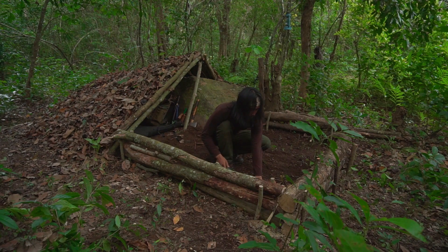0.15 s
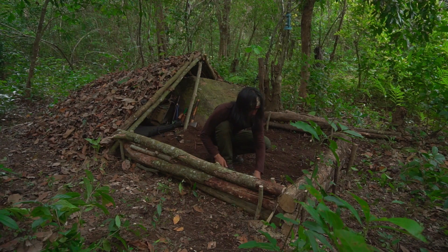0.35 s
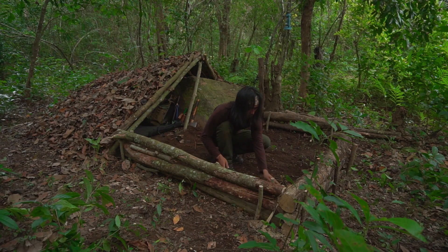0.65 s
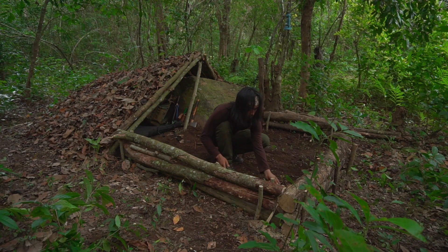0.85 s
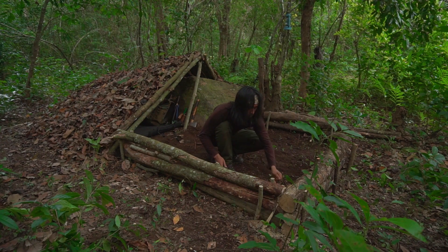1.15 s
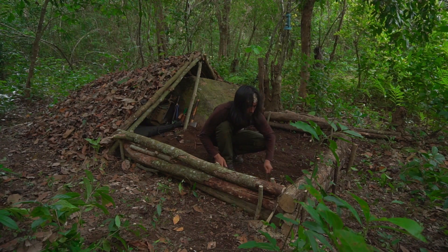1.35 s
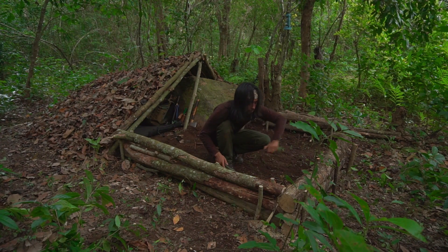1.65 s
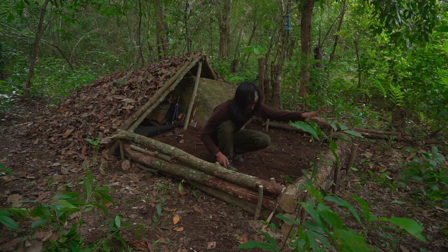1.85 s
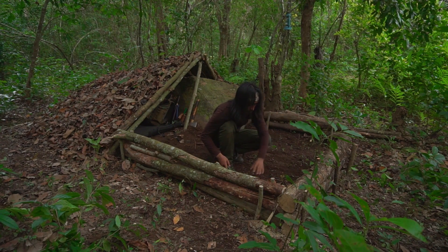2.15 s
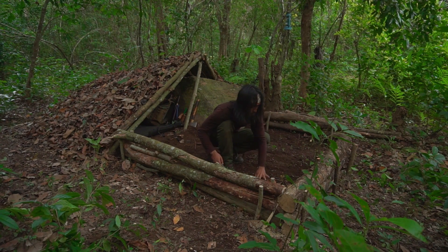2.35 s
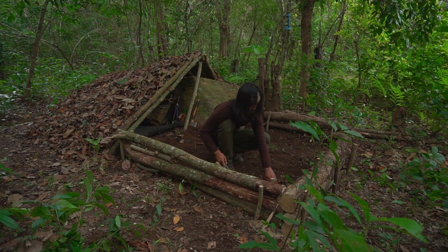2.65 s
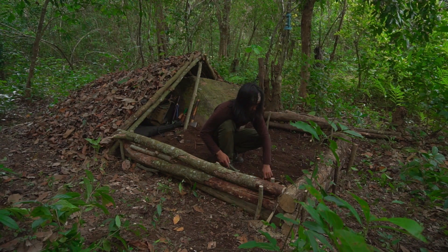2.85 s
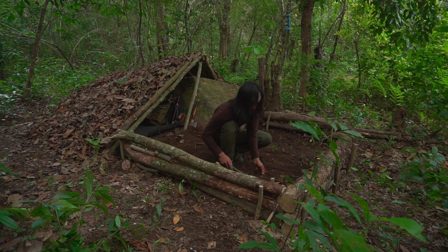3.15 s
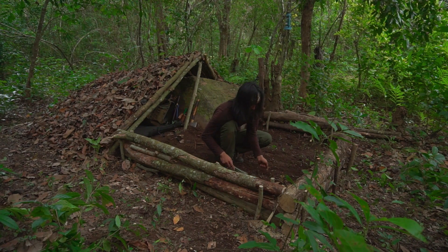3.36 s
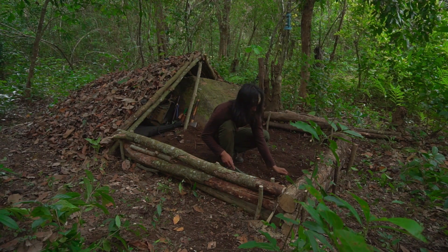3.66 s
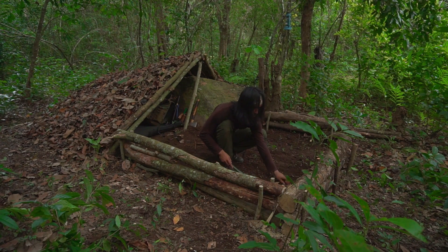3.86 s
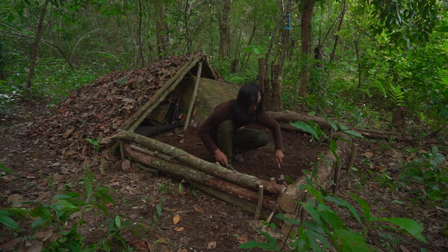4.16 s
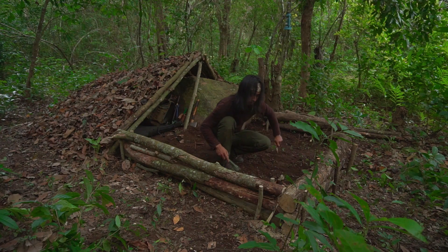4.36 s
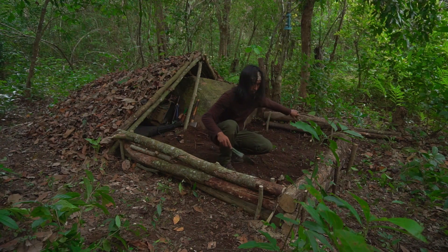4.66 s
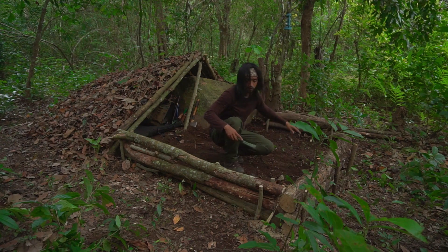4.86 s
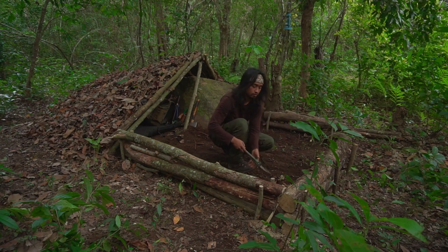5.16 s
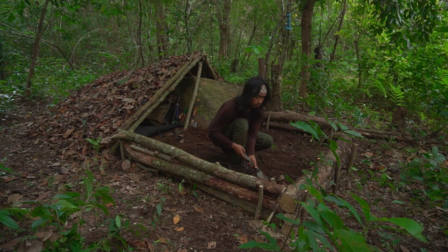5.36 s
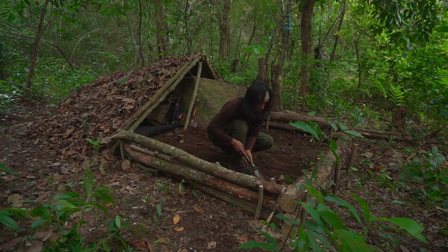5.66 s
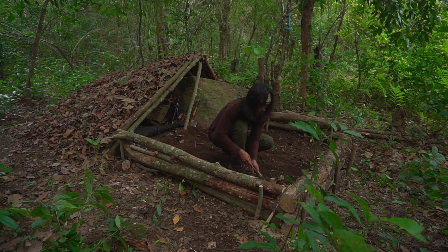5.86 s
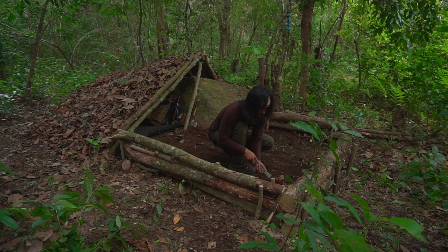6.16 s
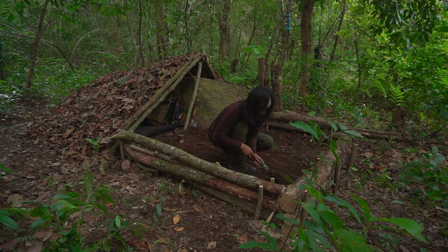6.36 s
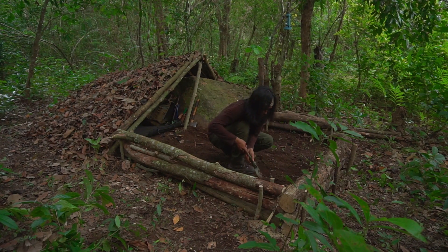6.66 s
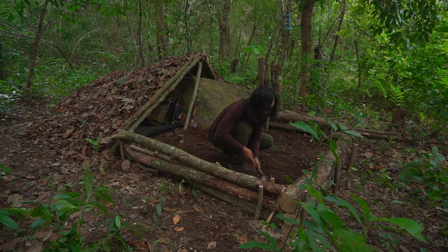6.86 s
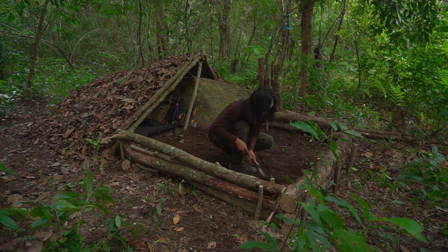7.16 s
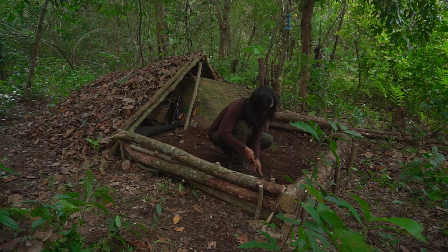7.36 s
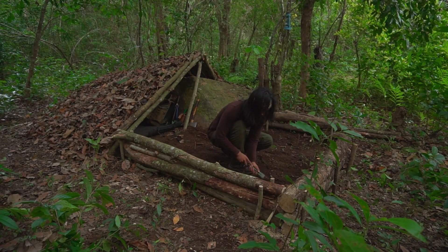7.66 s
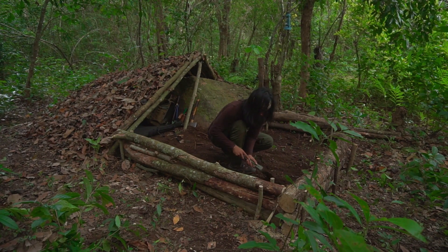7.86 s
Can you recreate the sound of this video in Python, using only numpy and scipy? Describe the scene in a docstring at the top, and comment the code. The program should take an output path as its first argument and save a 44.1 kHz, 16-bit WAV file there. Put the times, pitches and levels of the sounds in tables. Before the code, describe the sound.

Forest crickets trill steadily over a soft hush while someone close by rustles dry leaves, snaps twigs and knocks a stick on a log.

```python
"""A tropical forest floor. From the start a cricket trills over a broad hush and a far chorus, while
a soft buzz comes and goes, other crickets chirp, a bird calls and an insect rasps. Just before 1 s,
someone close by starts picking through dry litter; a stick knocks on a hollow log, and from 2.5 s twigs
snap. Near the end a blade prodding the soil chatters on a stone. Throughout, the trees scatter a short
diffuse echo, and the sound arrives at two unlike microphone ports."""
import sys
import numpy as np
from scipy import signal
from scipy.fft import rfft, irfft, next_fast_len
from scipy.io import wavfile
from scipy.ndimage import map_coordinates

SR = 44100
rng = np.random.default_rng(int(sys.argv[2]) if len(sys.argv) > 2 else 0)


def log_audio(samples):
    """Write samples as a 16-bit WAV file to the path given in sys.argv[1]."""
    # one column per channel
    frames = np.atleast_2d(samples).T
    # limit to full scale, then quantise
    limited = np.clip(frames, -1, 1)
    pcm = np.round(limited * 32767).astype(np.int16)
    wavfile.write(sys.argv[1], SR, pcm)


N = 353241


def amp(db):
    return 10 ** (np.asarray(db) / 20)


def unit_rms(x):
    return x / np.sqrt(np.mean(x ** 2) + 1e-20)


def along(points, hz):
    """Interpolation of (Hz, value) points on a logarithmic frequency axis."""
    point_hz, values = np.transpose(points)
    return np.interp(np.log(hz + 1), np.log(point_hz + 1), values)


def wobble(rate, size=N):
    """Smooth random modulation, with rate knots a second."""
    knots = rng.standard_normal(int(size * rate / SR) + 4)
    return map_coordinates(knots, [np.arange(size) * rate / SR])


def filtered(x, response):
    """Linear filtering: the spectrum of x times a complex frequency response."""
    size = next_fast_len(x.shape[-1] + SR // 12)
    return irfft(rfft(x, size) * response(np.fft.rfftfreq(size, 1 / SR)), size)[..., :x.shape[-1]]


def resonance(f, hz, width_hz):
    """Two equal damped resonators in cascade, with gain 1 at their centre."""
    return (1j * f * width_hz / (hz * hz - f * f + 1j * f * width_hz)) ** 2


def tone(pitch_hz):
    """A sine whose phase is the integral of its frequency."""
    return np.sin(2 * np.pi * np.cumsum(pitch_hz, axis=-1) / SR)


def add(track, start_s, sound):
    """Superposition of a sound on a track."""
    part = track[..., round(start_s * SR):][..., :sound.shape[-1]]
    part += sound[..., :part.shape[-1]]


def tree_echo(x, t60, wet_db):
    """Scattering: trunks add a diffuse tail, different at each port, that falls 60 dB in t60 seconds."""
    t = np.arange(SR // 2) / SR
    tail = rng.standard_normal((2, len(t))) * amp(-60 * t / t60) * (1 - np.exp(-t / 0.0017))
    echo = signal.fftconvolve(np.atleast_2d(x) * [[1], [1]], tail / np.linalg.norm(tail[0]), axes=1)
    return x + amp(wet_db) * echo[:, :N]


# The spectrum of the hush. Each row: frequency in Hz, relative spectral density in dB.
HUSH_SPECTRUM = [(20, -36), (60, -38.5), (140, -26), (300, -13.5), (450, -5.5), (560, -3.5), (800, -3),
                 (1300, -2.5), (2050, -3.5), (3000, -8), (4300, -11.5), (5400, -15), (7500, -17.5),
                 (11300, -22.5)]
# Its likeness at the two ports. Each row: frequency in Hz, left-right correlation.
HUSH_CORRELATION = [(60, 0.52), (130, 0.76), (270, 0.42), (570, 0.67), (1210, 0.48), (2560, 0.57),
                    (5430, 0.23), (11500, 0.15)]


def hush():
    """Partial coherence: broad noise from afar reaches the ports as a shared and an opposed part."""
    angle = lambda hz: np.arccos(along(HUSH_CORRELATION, hz)) / 2
    colour = lambda hz: amp(along(HUSH_SPECTRUM, hz)) * [np.cos(angle(hz)), np.sin(angle(hz))]
    mid, side = filtered(rng.standard_normal((2, N)), colour)
    level_db = -41.5 + 0.45 * wobble(4.9)
    return amp(level_db) * unit_rms(np.array([mid + side, mid - side]))


# The bands of the far crickets. Each row: centre in Hz, width in Hz, relative level in dB.
CHORUS_BANDS = [(6121, 145, 5.5), (6203, 130, 5.5), (5776, 56, -1.5), (6010, 310, -9.5), (7590, 120, -17)]
# The crickets' loudness. Each row: time in seconds, far chorus level in dB, near trill level in dB.
CRICKET_LEVELS = [(0, -41.5, -68), (.5, -43, -48.5), (1.5, -42.5, -47.5), (2.0, -42.5, -54),
                  (2.5, -42.5, -48.5), (3.5, -44, -50.5), (4.5, -42.5, -49), (5.5, -42, -51.5),
                  (6.4, -44, -54), (6.8, -43, -59), (7.3, -43, -74), (7.7, -44, -51), (8.01, -39.5, -58)]


def chorus_and_trill():
    """Stridulation: far crickets sum to narrow-band noise; a near one strokes its wings twice a beat."""
    times, *levels = np.transpose(CRICKET_LEVELS)
    far_db, near_db = [np.interp(np.arange(N) / SR, times, level) for level in levels]
    bands = lambda f: sum(amp(db) * resonance(f, hz, width_hz) for hz, width_hz, db in CHORUS_BANDS)
    chorus = filtered(rng.standard_normal((2, N)), bands)
    beat_hz = 28.21
    beats = np.cumsum(beat_hz + .03 * wobble(1.5)) / SR + .2
    in_beat_s = (beats % 1) / beat_hz
    trill, phase_drift = np.zeros(N), 1.7 * wobble(24)
    for start_s, length_s, db in [(0, 0.0095, 1), (.0145, 0.008, -.5)]:
        progress = np.clip((in_beat_s - start_s) / length_s, 0, 1)
        cycles = length_s * (6290 * progress - 90 * progress ** 2)  # the wing slows, so the pitch sags
        trill += amp(db) * np.sin(np.pi * progress) ** 0.3 * np.sin(2 * np.pi * cycles + phase_drift)
    near = tree_echo(unit_rms(trill) * amp(near_db + 0.61 * wobble(3.82)), t60=0.89, wet_db=-10)
    far = amp(far_db) * unit_rms(chorus * amp(0.76 * np.array([wobble(8.3), wobble(12)])))
    return far + near * amp([[-4], [3]])  # the near cricket sits to the right


# Soft far buzzes. Each row: start and length in seconds, centre and width in Hz, level in dB.
BUZZ_BANDS = [(0, 0.12, 4600, 900, -44.5), (0.806, 0.19, 5000, 500, -47.5), (1.034, 0.17, 5030, 500, -47),
              (1.28, 0.11, 5000, 500, -46.5), (1.571, 0.15, 5100, 1100, -46),
              (1.698, .22, 4900, 1000, -46.5), (4.548, 0.41, 4580, 1000, -46.5),
              (6.11, 0.26, 5000, 1010, -48)]


def buzz():
    """Band-limited noise, incoherent between the ports, swells quickly and fades."""
    out = np.zeros((2, N))
    for start_s, length_s, hz, width_hz, db in BUZZ_BANDS:
        t = np.arange(round(length_s * SR)) / SR
        band = filtered(rng.standard_normal((2, len(t))), lambda f: resonance(f, hz, width_hz))
        envelope = np.sin(np.pi * (t / length_s) ** 0.17) ** 0.32
        add(out, start_s, amp(db) * envelope * unit_rms(band))
    return out


# Crickets that repeat one note. Each row: start in seconds, number of notes, period and note length
# in seconds, opening and held pitch in Hz, level in dB.
CHIRP_SERIES = [(0.005, 12, .681, .052, 7280, 7020, -58), (.08, 3, .648, .05, 7060, 7030, -54),
                (3.8, 7, .671, .062, 6710, 6670, -56)]
# Single notes of crickets and birds. Each row: start and length in seconds, opening and held pitch
# in Hz, level in dB, roughness from 0 to 1, left minus right level in dB.
SINGLE_NOTES = [(.8, .03, 7050, 7045, -59, .2, 0), (2.278, 0.023, 1614, 1610, -43, 0.05, 8),
                (2.325, .051, 1610, 1613, -40, .12, 6), (6.754, 0.054, 7170, 7040, -52, 0.3, 0),
                (7.274, 0.047, 6740, 6760, -47.5, 0.35, -6), (7.837, .018, 7950, 7940, -54.5, .1, 0),
                (7.868, 0.069, 6780, 6750, -51, 0.2, -6)]


def chirps_and_whistles():
    """Modulation sidebands: a sine settles on its pitch, and random flutter smears it into a band."""
    out, chirp_roughness = np.zeros((2, N)), 0.32
    chirps = [(start_s, length_s, opening_hz, held_hz, db + 1.5 * rng.normal(), chirp_roughness, 0)
              for first_s, count, period_s, length_s, opening_hz, held_hz, db in CHIRP_SERIES
              for start_s in first_s + period_s * np.arange(count)]
    for start_s, length_s, opening_hz, held_hz, db, roughness, pan_db in SINGLE_NOTES + chirps:
        t = np.arange(round(length_s * SR)) / SR
        glide_hz = held_hz + (opening_hz - held_hz) * np.exp(-t / .012)
        jitter_hz = 300 * roughness ** 1.5 * wobble(500, len(t))
        envelope = np.sin(np.pi * t / length_s) ** .5 * amp(11 * roughness * wobble(149, len(t)))
        gains = amp([[db + pan_db / 2], [db - pan_db / 2]])
        add(out, start_s, gains * envelope * np.sqrt(2) * tone(glide_hz + jitter_hz))
    return tree_echo(out, t60=.2, wet_db=-6)


# A bird's syllables. Each row: start and length in seconds, base pitch in Hz, level in dB.
BIRD_SYLLABLES = [(.005, .14, 4020, -53), (1.572, .12, 3860, -50.5), (1.708, .105, 3800, -49),
                  (1.83, .075, 3880, -51.5), (4.548, .07, 3790, -53), (4.64, .06, 3780, -55),
                  (4.715, .075, 3760, -53), (6.113, .09, 3880, -52)]


def bird():
    """Frequency modulation: a tone dives, then climbs slowly; random flutter makes it hoarse."""
    out = np.zeros(N)
    dive_hz, dive_s, climb_hz_per_s = 1500, .005, 1500
    for start_s, length_s, base_hz, db in BIRD_SYLLABLES:
        t = np.arange(round(length_s * SR)) / SR
        glide_hz = base_hz + dive_hz * np.exp(-t / dive_s) + climb_hz_per_s * t
        jitter_hz = 105 * wobble(260, len(t))
        envelope = np.sin(np.pi * (t / length_s) ** .6) ** .5 * amp(3.5 * wobble(110, len(t)))
        add(out, start_s, amp(db) * unit_rms(envelope * tone(glide_hz + jitter_hz)))
    return tree_echo(out, t60=.3, wet_db=0)


# An insect's phrases. Each row: start in seconds, number of syllables, period in seconds, level in dB.
RASP_PHRASES = [(.03, 8, 0.0845, -54), (2.612, 9, 0.0866, -54.5), (4.787, 6, .0837, -54.5),
                (6.17, 11, 0.0852, -55.5)]


def rasping_insect():
    """Stridulation: scratchy pulses drive two wing modes; the upper leads and the lower follows."""
    out, t = np.zeros(N), np.arange(SR // 12) / SR
    mode_hz, smear_hz, pulse_hz = np.array([[4060], [3775]]), 72, 81
    peak_s, spread_s = np.array([[.016], [.029]]), np.array([[.014], [.018]])
    swells = amp([[1], [-1]]) * np.exp(-((t - peak_s) / spread_s) ** 2)
    for first_s, count, period_s, db in RASP_PHRASES:
        for start_s in first_s + period_s * np.arange(count):
            pulses = (.5 + .5 * np.cos(2 * np.pi * (pulse_hz * t + rng.random()))) ** 1.2 + 0.5
            jitter_hz = smear_hz * np.array([wobble(386, len(t)), wobble(390, len(t))])
            wing = (swells * tone(mode_hz + jitter_hz)).sum(axis=0)
            late_s, accent_db = rng.standard_normal(2) * [.003, 1]
            add(out, start_s - .008 + late_s, amp(db + accent_db) * unit_rms(pulses * wing))
    return tree_echo(out, t60=0.34, wet_db=0.5)


# The crackle of dry leaves. Each row: frequency in Hz, relative spectral density in dB.
LEAF_SPECTRUM = [(1500, -32), (4000, -8), (6000, -9.5), (8000, -7), (11000, -11)]
# Fingers and blade move in the litter. Each row: start and length in seconds, crackle and scrape
# levels in dB, scrape centre in Hz.
LITTER_STROKES = [(0.868, 0.07, -54, -60, 3500), (1.287, 0.092, -54, -51, 2350),
                  (1.484, .07, -52.5, -68, 4000), (1.802, .05, -55, -60, 4000),
                  (2.409, 0.16, -50.5, -58, 3000), (2.688, 0.12, -54.5, -66, 4000),
                  (3.237, 0.44, -53.5, -71, 4200), (3.315, 0.043, -55, -50, 4170),
                  (3.465, 0.05, -39, -49, 3550), (3.469, .19, -50, -47, 3750),
                  (3.582, 0.029, -41, -49, 3300), (3.521, 0.049, -43.5, -46, 3840),
                  (3.564, 0.047, -41.5, -49, 3600), (3.613, 0.14, -49, -51, 3700),
                  (3.9, 0.083, -63, -69, 4000), (4.412, 0.11, -48.5, -53, 2450),
                  (4.608, 0.28, -58, -60, 3000), (5.85, 0.16, -54, -60, 3000),
                  (5.915, 0.06, -46, -46, 2120), (5.961, 0.25, -53.5, -62, 3200),
                  (6.403, 0.12, -47, -54, 3000), (6.829, 0.13, -48.5, -50.5, 3000),
                  (7.358, .12, -44.5, -45, 2200), (7.36, 0.096, -57, -46.5, 3460),
                  (7.382, 0.04, -60, -48, 1400), (7.39, .035, -48, -46, 2900),
                  (7.457, 0.082, -54, -53, 2600)]


def rustles():
    """Friction noise: leaves crackle in uneven grains, soil scrapes lower; each stroke trails off."""
    out = np.zeros(N)
    for start_s, length_s, crackle_db, scrape_db, hz in LITTER_STROKES:
        t = np.arange(round(length_s * SR)) / SR
        noise = rng.standard_normal((2, len(t)))
        grains = noise * amp([1.8 * wobble(900, len(t)), 2 * wobble(500, len(t))])
        colour = lambda f: np.array([amp(along(LEAF_SPECTRUM, f)), resonance(f, hz, 0.44 * hz)])
        crackle, scrape = filtered(grains, colour)
        friction = amp(crackle_db) * unit_rms(crackle) + amp(scrape_db) * unit_rms(scrape)
        envelope = np.sin(np.pi * (t / length_s) ** .45) ** .7 * amp(1.5 * wobble(90, len(t)))
        add(out, start_s, unit_rms(envelope) * friction)
    return out


def ringing(modes, t, attack_s, ratio=1, tilt_db=0, flip=1):
    """Free vibration: damped modes, tilted in dB per octave; a negative flip alternates their signs."""
    ring = np.zeros(len(t))
    for k, (hz, db, t60) in enumerate(modes):
        level_db = db + tilt_db * np.log2(hz / 1600) + rng.normal() - 60 * t / t60
        ring += flip ** k * amp(level_db) * np.sin(2 * np.pi * ratio * hz * t)
    return (1 - np.exp(-t / attack_s)) * ring


# The modes of the stick and of the log. Each row: frequency in Hz, level in dB, t60 in seconds.
STICK_MODES = [(1000, -3.5, 0.015), (1450, -6, 0.012), (1990, 1.5, 0.011), (3000, -6, 0.007),
               (4300, -9, 0.006), (8900, -14.5, 0.008)]
LOG_MODES = [(453, -9, 0.085), (469, -2, 0.068), (651, -4, 0.045), (870, -4, .035)]
# The stick meets the log, each time at another spot. Each row: start in seconds, level in dB, stick
# pitch ratio, then relative levels of hollow ring, crack and first contact in dB.
STICK_KNOCKS = [(1.2415, -19.5, 1.13, -6, -14, -4), (1.2602, -21.5, 0.99, -3, -18, -20),
                (1.285, -23, 1.09, -20, -11, -2), (1.28765, -8.5, 0.98, -5.5, -10, -1)]


def stick_on_log():
    """Impact excitation: the stick rings at once and the hollow log's resonance builds up behind it."""
    out, t = np.zeros(N), np.arange(SR // 8) / SR
    for start_s, db, ratio, hollow_db, crack_db, contact_db in STICK_KNOCKS:
        crack = amp(crack_db - 60 * t / 0.0055) * np.diff(rng.standard_normal(len(t) + 1))
        contact = amp(contact_db) * np.exp(-((t - .00013) / .00006) ** 2)
        stick = ringing(STICK_MODES, t, attack_s=0.00048, ratio=ratio)
        log = amp(hollow_db) * ringing(LOG_MODES, t, attack_s=0.012)
        add(out, start_s, amp(db) * (contact + crack + stick + log))
    return out


# Twigs, leaves and grit snap. Each row: start in seconds, tick and body levels in dB, body
# frequency in Hz, t60 in seconds.
FRACTURES = [(2.4638, -28, -33, 3770, .006), (2.966, -26, -33, 4020, 0.0054), (3.268, -27, -44, 3130, .006),
             (3.3119, -36, -38, 4090, .006), (3.335, -33, -31, 4200, .006), (3.3625, -33, -40, 4000, .005),
             (3.428, -36, -36, 3100, .005), (3.386, -29, -34, 3230, .006), (3.627, -46, -30, 3900, .018),
             (3.9235, -35, -42, 3000, .006), (3.9564, -31, -42, 2700, .006),
             (4.4154, -19, -23, 3400, 0.016), (4.4165, -36, -30, 1900, .01), (4.424, -36, -32, 2000, .012),
             (4.422, -25, -23.5, 3940, .014), (4.449, -24.5, -33, 4470, 0.0054),
             (4.5414, -45, -7, 3250, 0.00077), (4.5412, -50, -25, 1150, .0015),
             (4.543, -40, -26, 1780, 0.0091), (5.9252, -28, -41, 2300, .009),
             (6.2639, -31, -18, 3140, 0.019), (6.264, -43, -29, 6900, .014),
             (6.263, -45, -21.5, 4060, 0.016), (6.41, -25, -33, 2660, .006),
             (6.7952, -22, -21.5, 3700, 0.018), (6.7968, -40, -27, 4260, .02),
             (6.7957, -45, -23, 7200, .012), (6.804, -40, -22, 8800, 0.013), (6.87, -26, -36, 3500, .008),
             (6.891, -33, -33, 3200, .01), (6.8137, -19.5, -36, 2800, 0.0092),
             (7.3719, -33, -16, 2870, 0.0044)]


def snaps():
    """Brittle fracture: an impulse and a brief noise burst give a bright tick and ring what broke."""
    out, t = np.zeros(N), np.arange(SR // 16) / SR
    impulse = np.array([[3], [12]]) * (t == 0)
    for start_s, tick_db, body_db, hz, t60 in FRACTURES:
        width_hz = hz * 0.4 * (.006 / t60) ** 0.48  # a longer ring has a narrower band
        burst = (rng.standard_normal((2, len(t))) + impulse) * amp(-60 * t / t60)
        colour = lambda f: np.array([resonance(f, 7100, 8500), resonance(f, hz, width_hz)])
        tick, body = filtered(burst, colour)
        add(out, start_s, amp(tick_db) * tick / abs(tick).max() + amp(body_db) * body / abs(body).max())
    return out


# The modes of the blade. Each row: frequency in Hz, level in dB, t60 in seconds.
BLADE_MODES = [(503, -26.5, 0.093), (1330, -6, 0.018), (2195, 3.5, 0.0085), (3700, -6, 0.015),
               (4290, -1, 0.017), (7600, -1.5, 0.006), (8700, 2, 0.0048)]
# The blade chatters on a stone. Each row: start in seconds, level in dB, brightness in dB per octave,
# relative grit level in dB.
BLADE_STRIKES = [(7.3518, -14, -5, -20), (7.3531, -14, -3, -2), (7.3544, -21, -3, -3),
                 (7.3571, -18.5, 1, 1), (7.3593, -23, 0, -5)]


def blade_on_stone():
    """Repeated impact: each contact excites the blade's modes and a short hiss of grit."""
    out, t = np.zeros(N), np.arange(SR // 8) / SR
    for start_s, db, tilt_db, grit_db in BLADE_STRIKES:
        hiss = filtered(rng.standard_normal(len(t)), lambda f: resonance(f, 7700, 6000))
        grit = amp(grit_db + 5 - 60 * t / 0.014) * hiss
        blade = ringing(BLADE_MODES, t, attack_s=0.00036, tilt_db=tilt_db, flip=-1.01)
        add(out, start_s, amp(db) * (blade + grit))
    return out


def scene():
    """Superposition: the forest's voices add to the close sounds of work in the litter."""
    forest = hush() + chorus_and_trill() + buzz() + chirps_and_whistles() + bird() + rasping_insect()
    litter = tree_echo(rustles(), t60=0.16, wet_db=-1)
    radiation = lambda f: (1j * f / (1j * f + 200)) ** 3  # small light things radiate no deep bass
    impacts = filtered(stick_on_log() + snaps() + blade_on_stone(), radiation)
    return forest + litter + tree_echo(impacts, t60=0.052, wet_db=-11.5)


# The ports' gain mismatch. Each row: frequency in Hz, left minus right level in dB.
PORT_GAIN_MISMATCH = [(60, 0), (170, 0), (490, -2), (1410, -6), (4020, -5.5), (11500, -3.5)]
# Their phase mismatch. Each row: frequency in Hz, lead of the left port in radians.
PORT_PHASE_MISMATCH = [(60, 0), (500, .7), (1200, .9), (2200, .58), (4000, .45), (6000, .15), (8000, -.3),
                       (10500, -.7)]


def record(dry):
    """Frequency response: the ports differ in gain and phase; the top treble drops to a shelf, then ends."""
    half = np.array([[.5], [-.5]])
    edge_hz, shelf_db, limit_hz = 11200, -44, 15000
    gain = lambda hz: amp(half * along(PORT_GAIN_MISMATCH, hz))
    phase = lambda hz: np.exp(1j * half * along(PORT_PHASE_MISMATCH, hz))
    shelf = lambda hz: np.clip((edge_hz - hz) / 140, amp(shelf_db / 2), 1) ** 2
    return filtered(dry, lambda hz: gain(hz) * phase(hz) * shelf(hz) * (hz < limit_hz))


dry = scene()
out = record(dry)
log_audio(out)
```